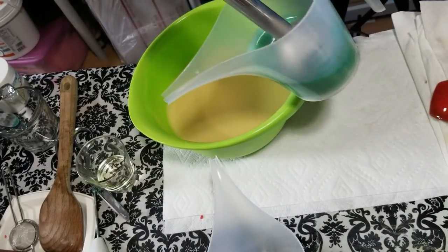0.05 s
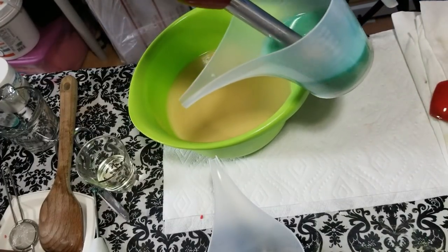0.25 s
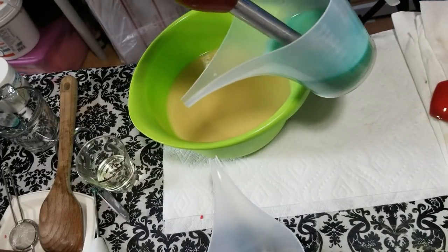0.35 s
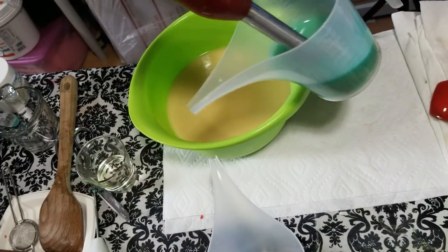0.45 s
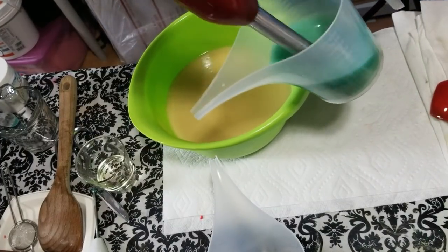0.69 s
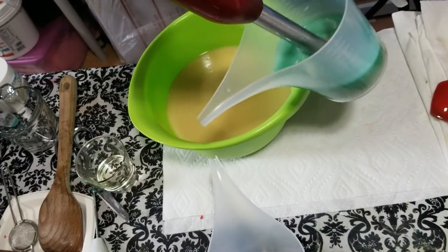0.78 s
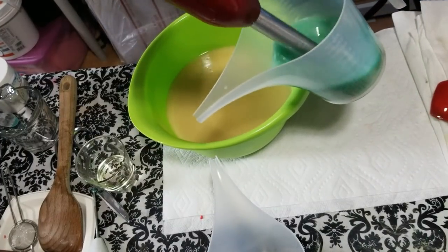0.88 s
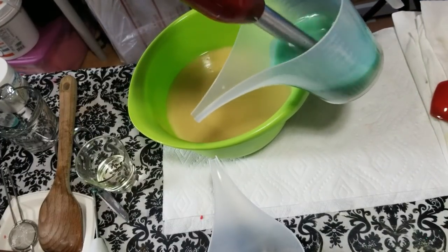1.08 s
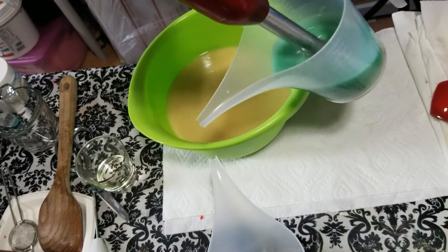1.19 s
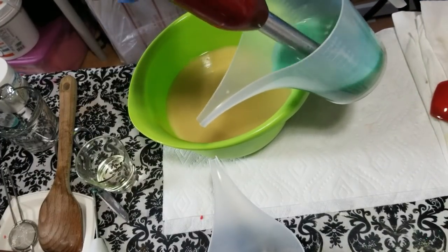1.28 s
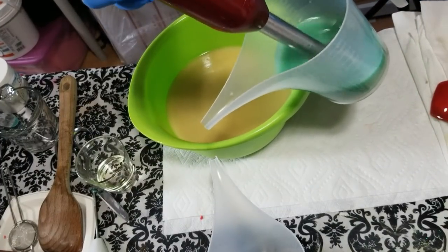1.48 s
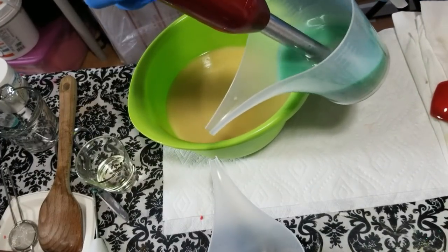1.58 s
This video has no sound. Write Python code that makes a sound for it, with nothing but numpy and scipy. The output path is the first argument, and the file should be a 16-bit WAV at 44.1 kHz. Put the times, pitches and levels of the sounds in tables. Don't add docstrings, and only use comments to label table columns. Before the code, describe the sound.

Stick blender head bumping a plastic jug: near quiet, a short bubbly pop, then a burst of hollow wet knocks, strongest early, continuing as softer taps and rubs; close phone pickup, small room, faint hiss.

```python
import sys
import numpy as np
from scipy import signal
from scipy.fft import rfft, irfft, next_fast_len
from scipy.io import wavfile
from scipy.ndimage import map_coordinates

SR = 44100
rng = np.random.default_rng(int(sys.argv[2]) if len(sys.argv) > 2 else 0)


def int16_out(signal):
    q = np.round(np.clip(np.atleast_2d(signal).T, -1, 1) * 32767)
    wavfile.write(sys.argv[1], SR, q.astype(np.int16))


def boost_factor(decibels):
    exponent = np.asarray(decibels, float) / 20
    return 10 ** exponent


N = 72765

# start_s [s], level_db [dB], thump_db [dB], hollow_db [dB], bright_db [dB]
FIRM_KNOCKS = [(0.455, -30, -15, -3, 2), (0.512, -19, -3, 5, 2), (0.595, -5.5, -7.5, -7.5, 4.5),
               (0.653, -26, -1, 0.5, 3), (0.685, -13, -11, -4.5, -0.5), (0.714, -15, -27, -1.5, 0.5),
               (0.77, -20.5, 3, 4.5, 3.5), (0.831, -17, 7, -0.5, 5.5), (0.958, -24.5, 5, -1, -4),
               (0.983, -30.5, 4, 6.5, -1), (1.03, -19, 3, 0, 0.5), (1.059, -28, -8, 1.5, 1),
               (1.124, -18, -5, 0.5, -11), (1.184, -34.5, -1, 6, 3), (1.228, -22, 7, -0.5, 2),
               (1.315, -31.5, 9.5, 5, -3), (1.421, -17, 3, -3, -2.5), (1.446, -23.5, 4, 0, -2.5),
               (1.52, -30, 8.5, 4.5, -4)]
# start_s [s], level_db [dB], hollow_db [dB], bright_db [dB]
LIGHT_TAPS = [(.568, -73.5, 49, 46), (.5975, -19.5, 3, -29), (0.592, -37, 6, 11), (.737, -30, -2, -3),
              (.808, -36.5, 6.5, 3), (.821, -42.5, 19, 8), (.861, -28.5, -4, -1.5), (.874, -53, -4, -11),
              (.910, -37.5, 3.5, -22), (.922, -41.5, 11.5, -11), (.942, -33.5, 4, -16), (1.002, -50, 8, -3),
              (1.130, -14.5, -6, 2.5), (1.144, -31.5, 3.5, 7), (1.216, -40, 13.5, 6), (1.250, -28, -1, -2),
              (1.270, -38.5, 8, -2), (1.293, -47, 11, -4), (1.333, -37.5, 8.5, 0), (1.383, -41, 7, -8),
              (1.465, -36, 2, 11), (1.480, -46, 10, 2), (1.502, -38.5, 0, -22), (1.512, -37, -1, -13),
              (1.531, -51, -22, -3)]
# mode_hz [Hz], level_db [dB], t60_s [s]
WALL_MODES = [(250, -12, 0.045), (365, -6, 0.031), (444.6, -8.5, 0.071), (555, -7, 0.059),
              (747, -2.5, 0.048), (855, -0.5, 0.014), (1065, -22, 0.0053), (1410, 3, 0.015),
              (1725, -1.5, 0.0089), (2026, 2.5, 0.02), (2304, -21.5, 0.035), (2900, -0.5, 0.012),
              (3284, -2.5, 0.013), (4660, 6.5, 0.0027)]
# freq_hz [Hz], density_db [dB per Hz]
CRACK_COLOUR = [(800, -26.5), (2500, -4), (4000, 0.5), (5500, 1.5), (7000, -8), (10000, -21), (13000, -15),
                (15000, -24)]
# time_s [s], drag_db [dB]
DRAG_LEVEL = [(.28, -103), (0.362, -88.5), (.44, -75), (0.471, -60), (.6, -66.5), (.85, -66.5),
              (1.0, -65.5), (1.1, -79), (1.15, -68), (1.3, -74.5), (1.39, -69), (1.46, -79), (1.53, -69),
              (1.57, -98)]
# mode_hz [Hz], level_db [dB], t60_s [s]
POP_MODES = [(250, -44, 0.013), (422, -40.5, 0.11), (1194, -22, 0.018), (1806, -47.5, 0.046),
             (7450, -51.5, .04), (10500, -50.5, 0.015)]
# freq_hz [Hz], density_db [dB per Hz]
SPIT_COLOUR = [(500, -4), (1900, 4.5), (3500, -12), (7000, 0), (9000, -10), (13000, -10.5)]
# band_hz [Hz], t60_s [s], level_db [dB]
ROOM_BANDS = [(134, 0.71, -11.5), (324, 0.19, -4), (753, 0.23, -13.5), (1980, 0.15, -9.5),
              (5200, 0.47, -19.5), (12540, 0.05, -8)]
# freq_hz [Hz], density_db [dB per Hz]
FLOOR_COLOUR = [(30, -9.5), (130, 0), (350, -6), (700, -24), (1800, -12.5), (3300, -24.5), (9000, -34),
                (13000, -21)]

HOLLOW_BELOW_HZ, BRIGHT_ABOVE_HZ, WALL_CUT_HZ = 1000, 2500, 150
SCATTER_DB, DETUNE, PHASE_SPREAD_RAD = 1.8, 0.015, 1.0
WET_DAMP_T60_S = 0.03
KNOCK_DB, KNOCK_LAG_S, CONTACT_S = -10.5, 0.00121, 0.0001
CHATTER_T60_S, CHATTER_DB = 0.048, -13
THUMP_HZ, THUMP_DB, THUMP_RISE_S, THUMP_T60_S, THUMP_DETUNE = 116, -11, 0.0061, 0.1, 0.12
SLOSH_HZ, SLOSH_DB = 65, -14.5
CRACK_DB, CRACK_T60_S, CRACK_LIKE = -14.5, 0.016, 0.5
WASH_DB, WASH_T60_S = -13, 0.12
SLIPS_PER_S, SLIP_SPREAD_DB = 700, 3
POP_S, POP_HZ, POP_DB, POP_RISE_S, POP_GLIDE, POP_NARROW = 0.2112, 775, -7, 0.0031, 0.035, 1.3
SMALL_POP_S, SMALL_POP_DB = 0.4785, -29
SPIT_DB, SPIT_T60_S, POP_ROOM_DB = -41, 0.042, 4.5
TICK_S, TICK_HZ, TICK_DB, TICK_WIDTH_S = 1.6494, 12500, -50, 0.0004
LEFT_LAG_S, SHADE_HZ, SHADE_DB = 0.00006, 4500, -7
ROOM_LIKE, ROOM_GAP_S = 0.34, 0.0049
FLOOR_DB, EARLIER_DB, EARLIER_T60_S = -63.5, -56.5, 0.52
LOW_CUT_HZ, TOP_HZ = 35, 14700
MIRROR = np.array([[1], [-1]])


def shape(x, points):
    hz, db = np.array(points, float).T
    length = x.shape[-1]
    n = next_fast_len(length)
    f = np.maximum(np.arange(n // 2 + 1) * SR / n, 1)
    gain = boost_factor(np.interp(np.log(f), np.log(hz), db))
    return irfft(rfft(x, n) * gain, n)[..., :length]


def unit(x):
    return x / np.sqrt(np.mean(x ** 2))


def fade(t, t60):
    return np.exp(-np.log(1000) * t / t60)


def add(out, start_s, x):
    i = int(start_s * SR)
    out[..., i:i + x.shape[-1]] += x[..., :N - i]


def wall_ring(t, chance, hollow_db, bright_db):
    hz, db, t60 = np.array(WALL_MODES).T[:, :, None]
    hollow = hz < HOLLOW_BELOW_HZ
    db = db + SCATTER_DB * chance[0] + hollow_db * hollow + bright_db / 2 * (hz > BRIGHT_ABOVE_HZ)
    t60 = np.minimum(t60, WET_DAMP_T60_S * (1 + hollow / 2))
    sides = np.cos(np.pi * (np.arange(len(hz)) // 2))[:, None]
    phase = 2 * np.pi * hz * (1 + DETUNE * chance[1]) * t + PHASE_SPREAD_RAD * chance[2]
    return np.sum(sides * boost_factor(db) * np.sin(phase) * fade(t, t60), axis=0)


def rebounds(t, noise):
    blows = boost_factor(CHATTER_DB) * np.sign(noise) * (np.abs(noise) > 2.4) * fade(t, CHATTER_T60_S)
    blows[0] = 1
    push = np.exp(-(t[:64] / CONTACT_S - 2) ** 2)
    return np.convolve(blows, push / push.sum())


def thump(t, chance):
    swell = (1 - np.exp(-(t / THUMP_RISE_S) ** 2)) * fade(t, THUMP_T60_S)
    turn = 2 * np.pi * t * (1 + THUMP_DETUNE * chance[1, :2])
    low = boost_factor(THUMP_DB) * np.sin(THUMP_HZ * turn[0])
    slosh = boost_factor(SLOSH_DB) * np.sin(SLOSH_HZ * turn[1])
    return swell * (low + slosh)


def knock(chance, grit, thump_db, hollow_db, bright_db):
    t = np.arange(grit.shape[1]) / SR
    ring = wall_ring(t, chance, hollow_db, bright_db)
    walls = signal.fftconvolve(ring, rebounds(t, grit[1]))[:len(t)]
    walls = signal.sosfilt(signal.butter(2, WALL_CUT_HZ, "high", fs=SR, output="sos"), walls)
    decay = fade(t, CRACK_T60_S) + boost_factor(WASH_DB) * fade(t, WASH_T60_S)
    crack = boost_factor(CRACK_DB + bright_db) * grit * decay
    return walls + boost_factor(thump_db) * thump(t, chance) + crack


def stirring():
    out = np.zeros((2, N))
    taps = [(s, db, -3, hollow, bright) for s, db, hollow, bright in LIGHT_TAPS]
    chance = np.clip(rng.standard_normal((64, 3, len(WALL_MODES), 1)), -2, 2)
    grit = unit(shape(rng.standard_normal((64, 2, 6000)), CRACK_COLOUR))
    grit[:, 0] = CRACK_LIKE * grit[:, 1] + np.sqrt(1 - CRACK_LIKE ** 2) * grit[:, 0]
    for k, (start_s, level_db, *colour) in enumerate(list(FIRM_KNOCKS) + taps):
        hit = knock(chance[k], grit[k], *colour)
        add(out, start_s + KNOCK_LAG_S, boost_factor(level_db + KNOCK_DB) * hit)
    return out


def drag():
    when, size, sign = rng.random((3, N))
    db = np.interp(np.arange(N) / SR, *np.array(DRAG_LEVEL).T) - SLIP_SPREAD_DB * np.log(size)
    slips = (when < SLIPS_PER_S / SR) * boost_factor(db) * np.sign(sign - 0.5)
    grit = unit(shape(rng.standard_normal((2, 4000)), CRACK_COLOUR))
    body = knock(np.zeros((3, len(WALL_MODES), 1)), grit, thump_db=0, hollow_db=0, bright_db=4)
    return signal.fftconvolve(slips[None], body, axes=1)[:, :N]


def pop():
    out = np.zeros(N)
    t = np.arange(6000) / SR
    u = t / POP_RISE_S
    swell = np.exp(-(u - 1) ** 2 * POP_NARROW) * np.tanh(4 * u)
    air = swell * np.sin(2 * np.pi * POP_HZ * t * (1 + POP_GLIDE * np.tanh(u / 2)))
    ring = sum(boost_factor(db) * np.sin(2 * np.pi * hz * t) * fade(t, t60) for hz, db, t60 in POP_MODES)
    spit = unit(shape(rng.standard_normal(len(t)), SPIT_COLOUR)) * fade(t, SPIT_T60_S)
    add(out, POP_S, boost_factor(POP_DB) * air + ring + boost_factor(SPIT_DB) * spit)
    add(out, SMALL_POP_S, boost_factor(POP_DB + SMALL_POP_DB) * air)
    return out


def tick():
    t = np.arange(N) / SR - TICK_S
    return boost_factor(TICK_DB) * np.exp(-(t / TICK_WIDTH_S) ** 2) * np.sin(2 * np.pi * TICK_HZ * t)


def ports(x):
    left = shape(x[0], [(SHADE_HZ / 2, 0.5), (SHADE_HZ * 2, SHADE_DB)])
    left = map_coordinates(left, [np.arange(N) - LEFT_LAG_S * SR], mode="nearest")
    return np.array([left, x[1]])


def room(x):
    t = np.arange(SR // 2) / SR
    hz, t60, db = np.array(ROOM_BANDS).T
    echo = 0
    for f in 60 * 2 ** np.arange(0, 8.1, 0.5):
        band_pass = signal.butter(2, [f / 1.19, f * 1.19], "band", fs=SR, output="sos")
        band = signal.sosfilt(band_pass, rng.standard_normal((2, len(t))))
        life_s = np.interp(np.log(f), np.log(hz), t60)
        size = boost_factor(np.interp(np.log(f), np.log(hz), db))
        echo = echo + band * fade(t, life_s) * size / np.sqrt(life_s * SR / 14)
    echo = np.sqrt(1 + ROOM_LIKE) * echo[0] + np.sqrt(1 - ROOM_LIKE) * echo[1] * MIRROR
    onset = 1 - np.exp(-(t / ROOM_GAP_S) ** 2)
    return signal.fftconvolve(x[None], echo * onset, axes=1)[:, :N]


def floor():
    t = np.arange(N) / SR
    mid, side, past, other = rng.standard_normal((4, N))
    side = shape(side, [(100, -17.5), (1000, 4), (5000, 1.5)])
    air = unit(shape(mid + side * MIRROR, FLOOR_COLOUR))
    tail = shape(past + 0.5 * other * MIRROR,
                 [(150, -35), (350, -18.5), (1400, -18), (3000, -24.5), (6000, -38), (15000, -32)])
    return boost_factor(FLOOR_DB) * air + boost_factor(EARLIER_DB) * unit(tail) * fade(t, EARLIER_T60_S)


def scene():
    burp = pop()
    stir = stirring() + drag()
    echoes = room(stir[1] + boost_factor(POP_ROOM_DB) * burp)
    return ports(burp + stir) + echoes + floor() + tick()


def low_pass(x):
    return signal.sosfilt(signal.butter(12, 15790, fs=SR, output="sos"), x)


def record(dry):
    x = signal.sosfilt(signal.butter(2, LOW_CUT_HZ, "high", fs=SR, output="sos"), dry)
    x = signal.sosfilt(signal.ellip(6, 0.3, 30, TOP_HZ, fs=SR, output="sos"), x)
    return low_pass(x)


dry = scene()
out = record(dry)
int16_out(out)
```